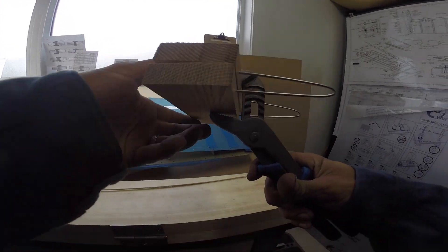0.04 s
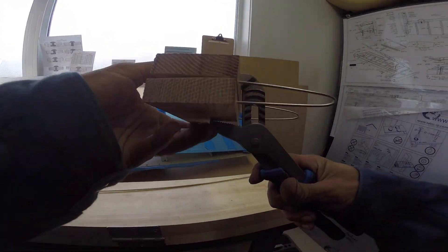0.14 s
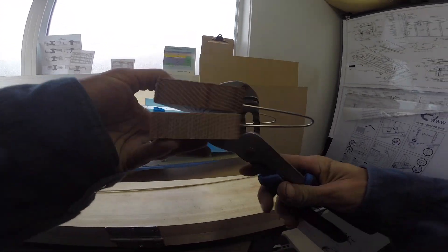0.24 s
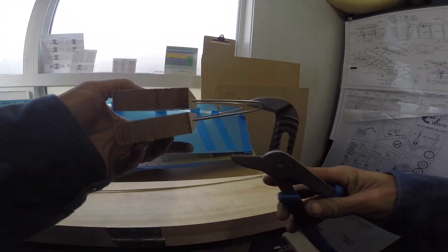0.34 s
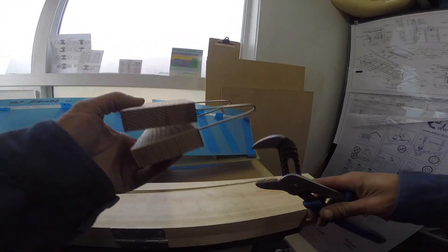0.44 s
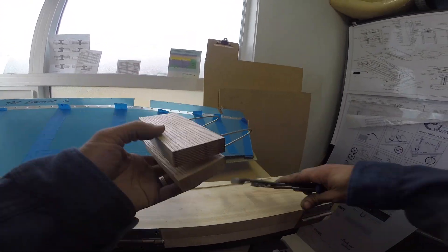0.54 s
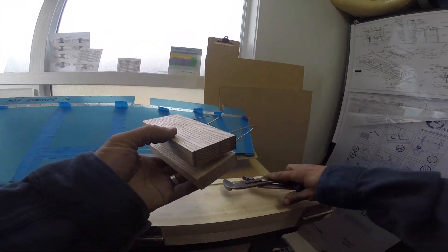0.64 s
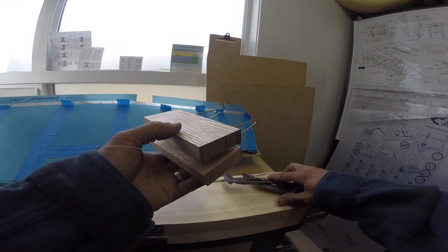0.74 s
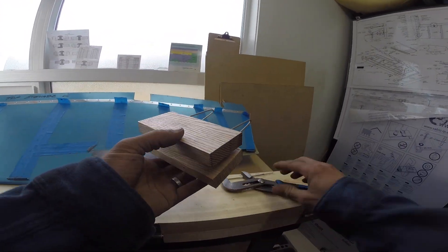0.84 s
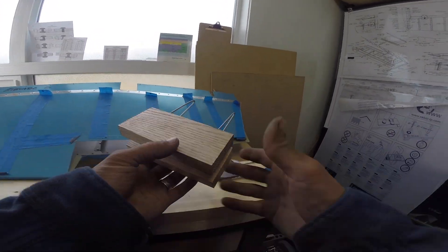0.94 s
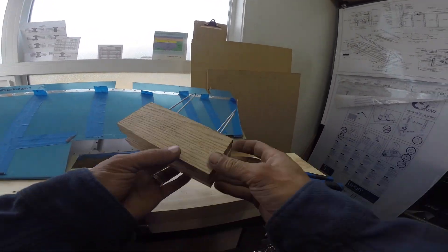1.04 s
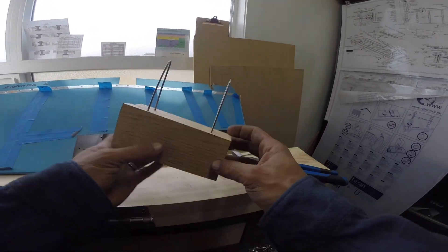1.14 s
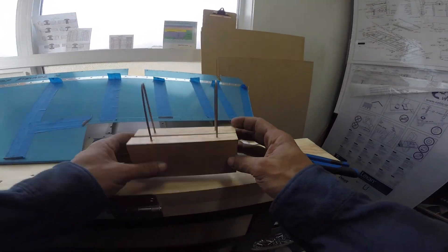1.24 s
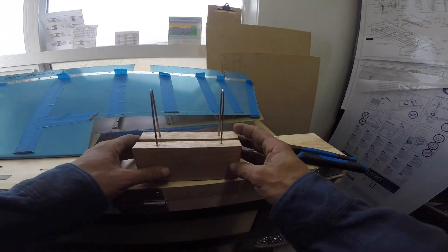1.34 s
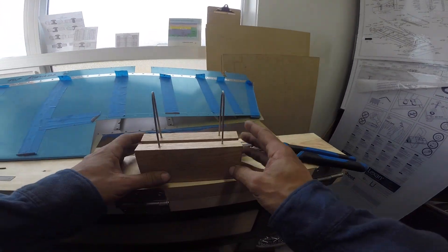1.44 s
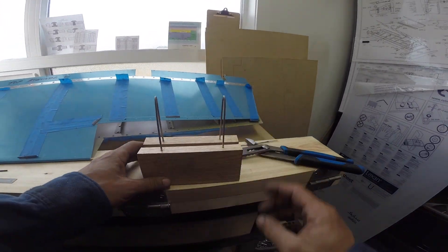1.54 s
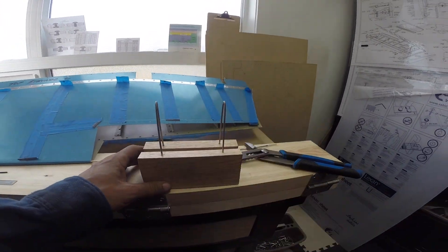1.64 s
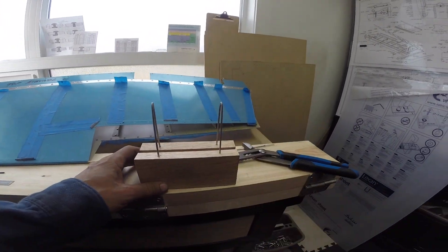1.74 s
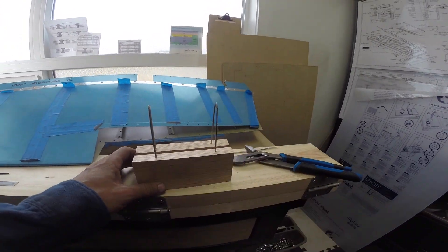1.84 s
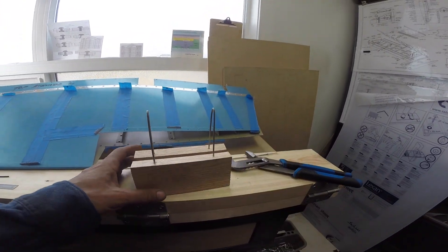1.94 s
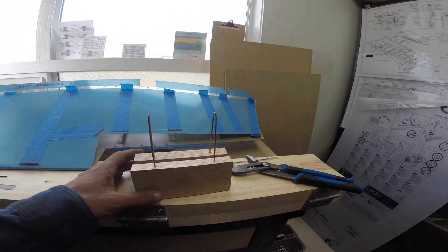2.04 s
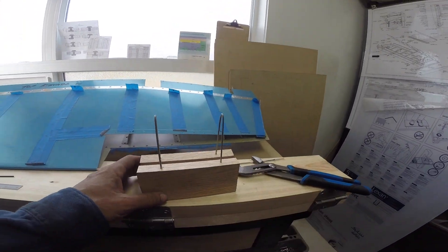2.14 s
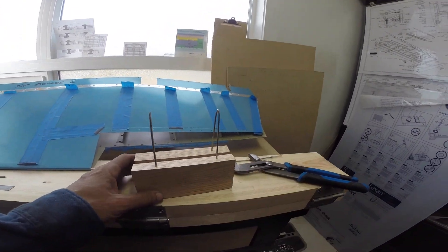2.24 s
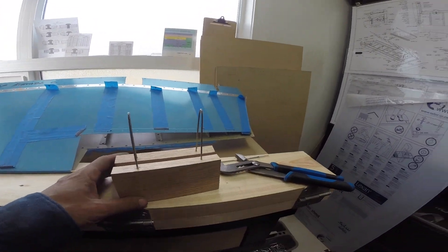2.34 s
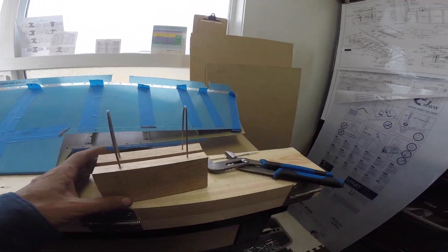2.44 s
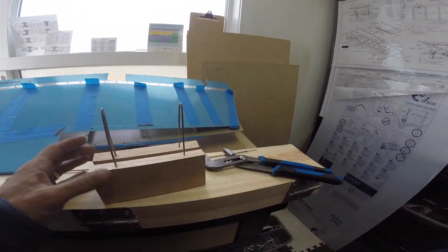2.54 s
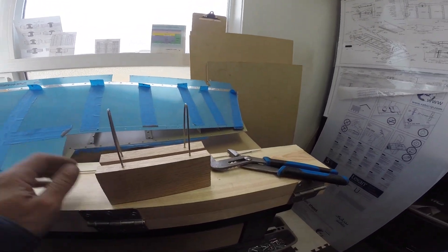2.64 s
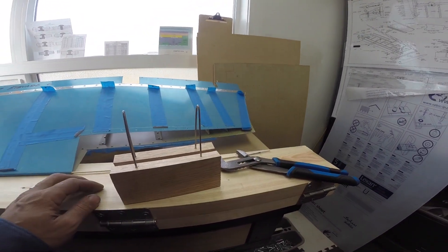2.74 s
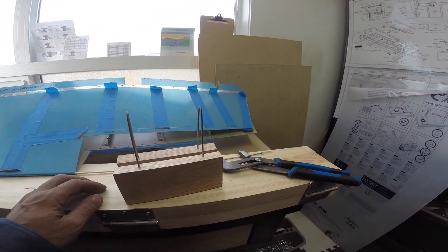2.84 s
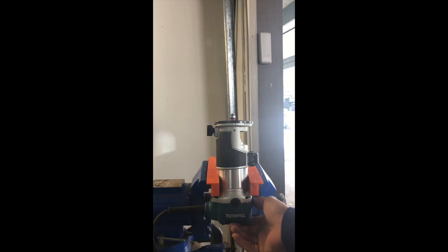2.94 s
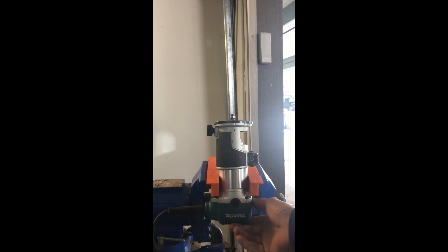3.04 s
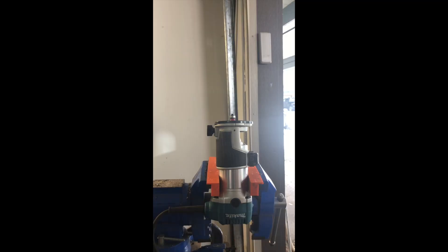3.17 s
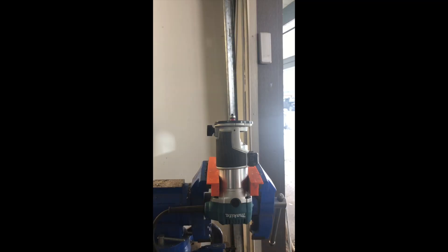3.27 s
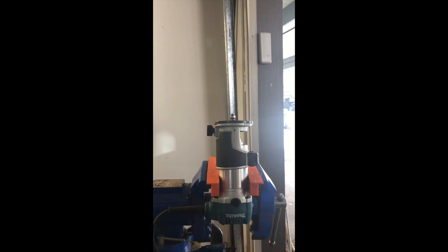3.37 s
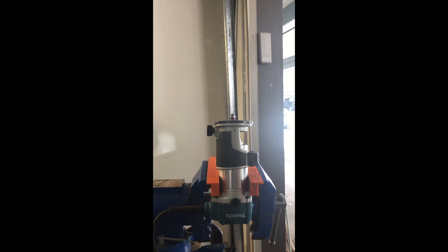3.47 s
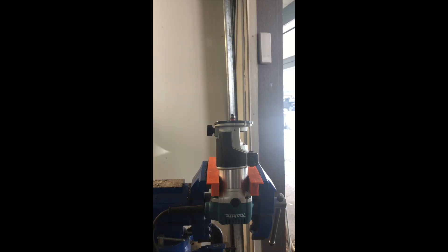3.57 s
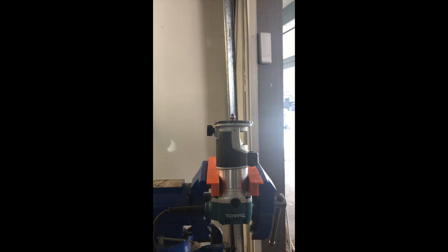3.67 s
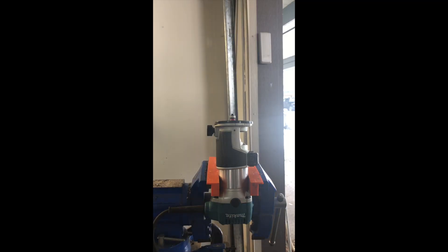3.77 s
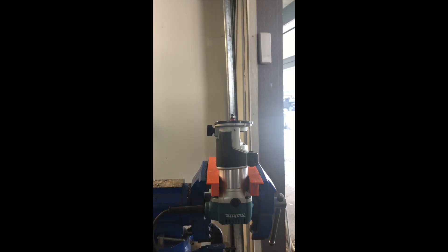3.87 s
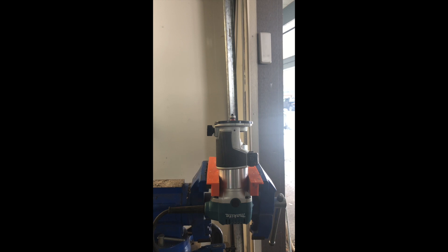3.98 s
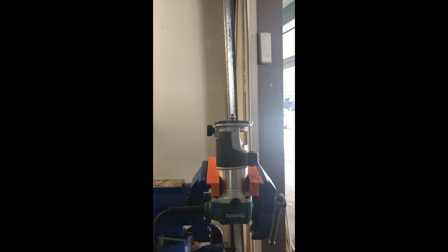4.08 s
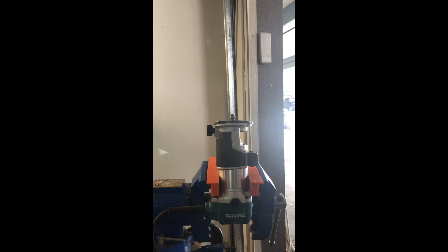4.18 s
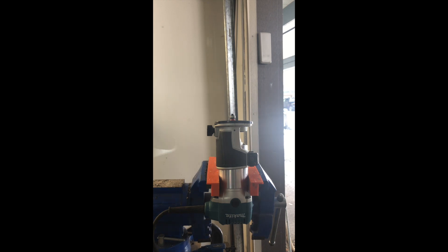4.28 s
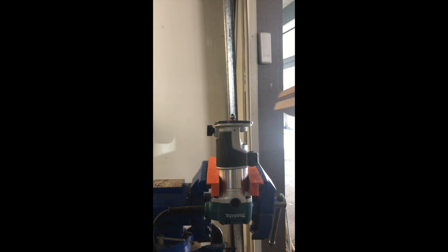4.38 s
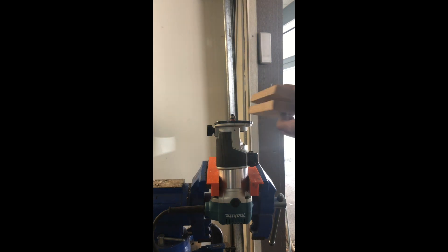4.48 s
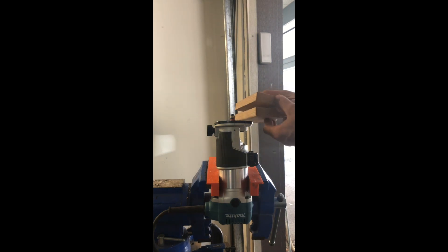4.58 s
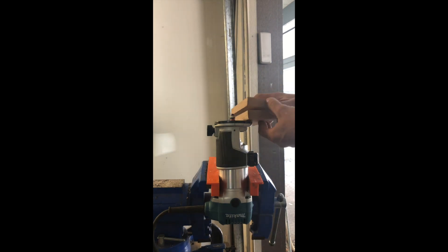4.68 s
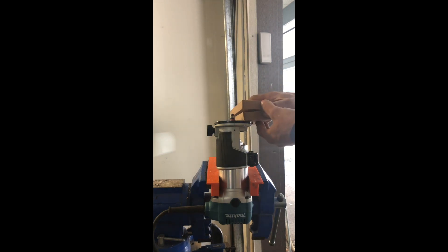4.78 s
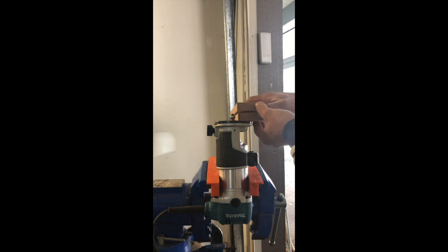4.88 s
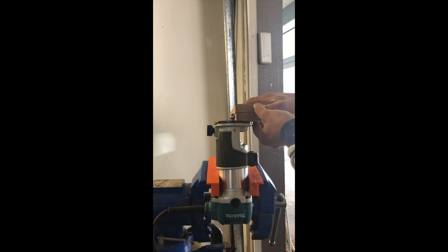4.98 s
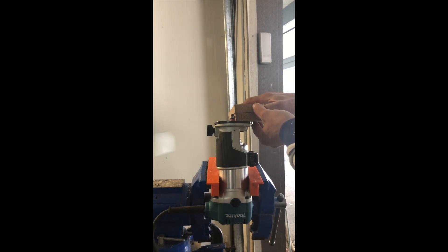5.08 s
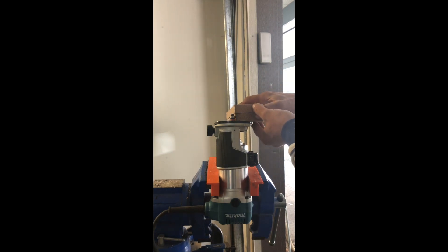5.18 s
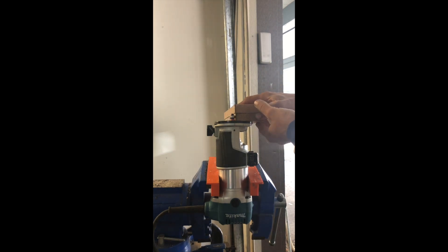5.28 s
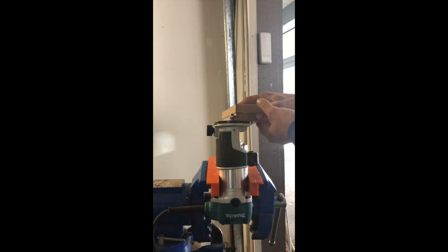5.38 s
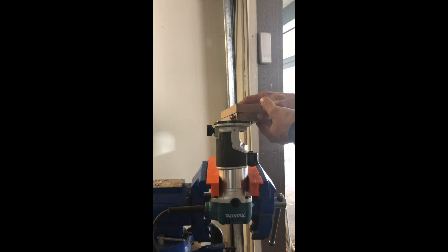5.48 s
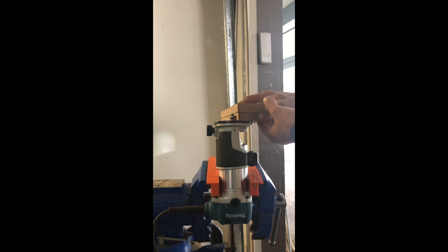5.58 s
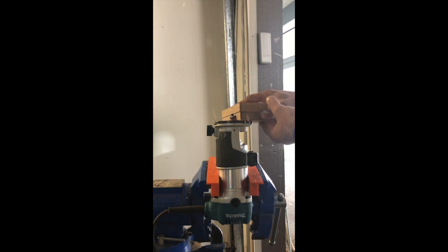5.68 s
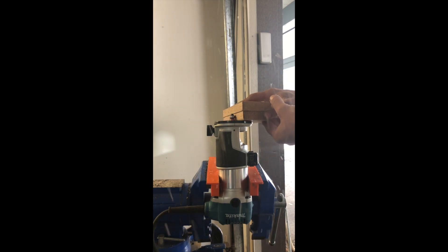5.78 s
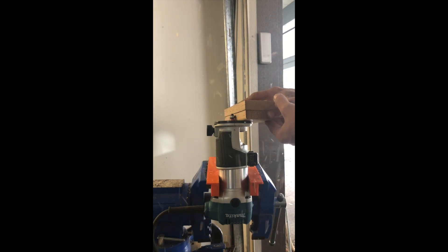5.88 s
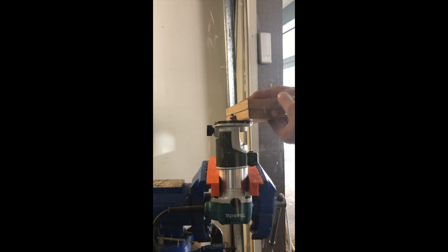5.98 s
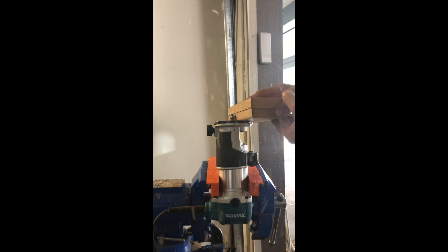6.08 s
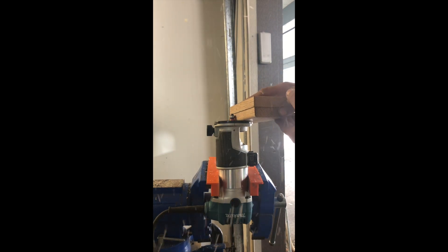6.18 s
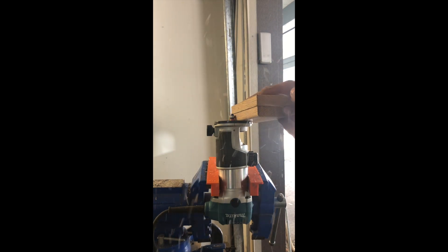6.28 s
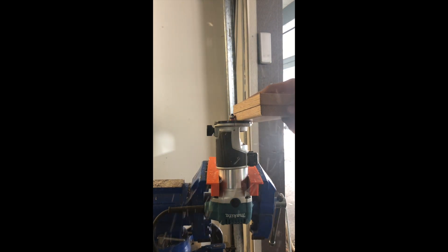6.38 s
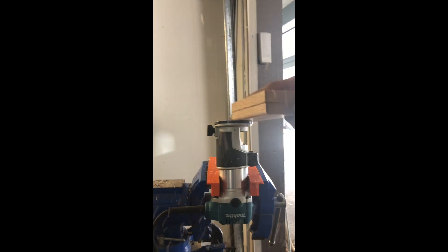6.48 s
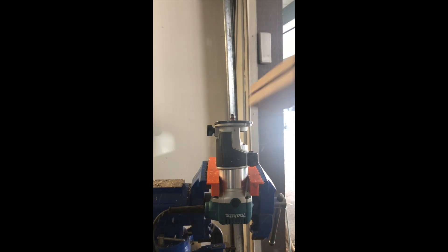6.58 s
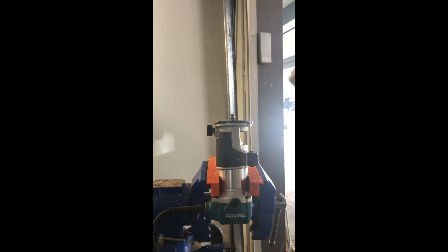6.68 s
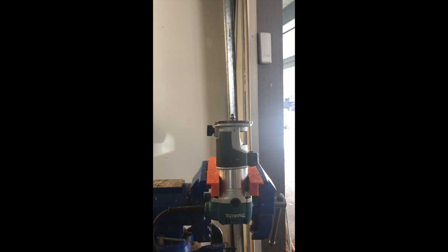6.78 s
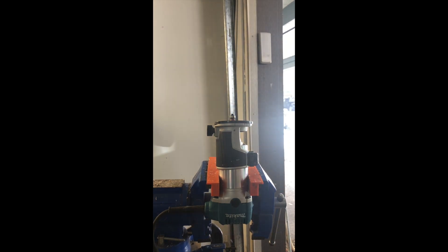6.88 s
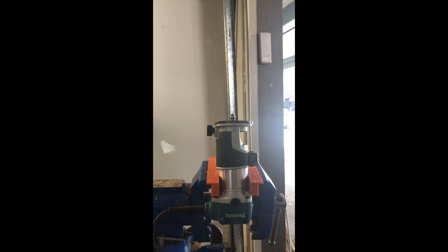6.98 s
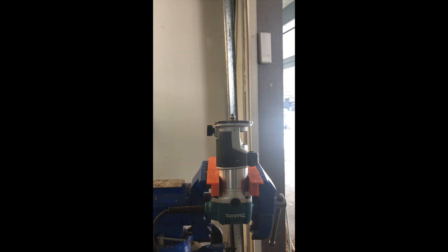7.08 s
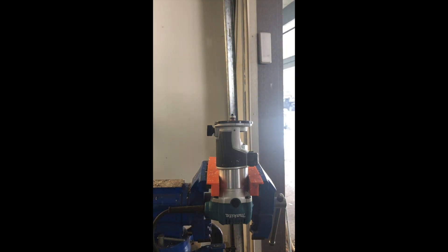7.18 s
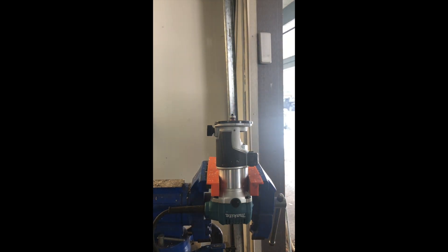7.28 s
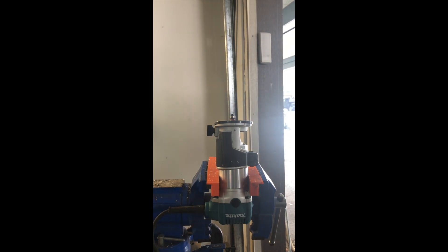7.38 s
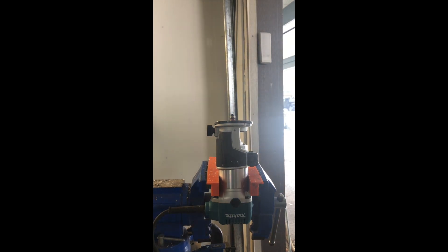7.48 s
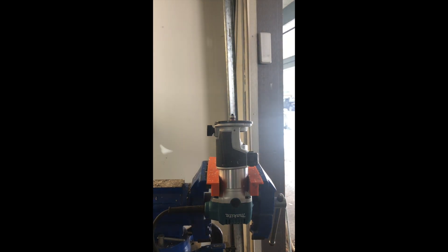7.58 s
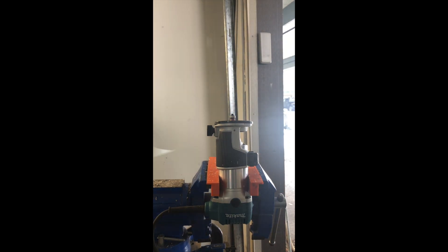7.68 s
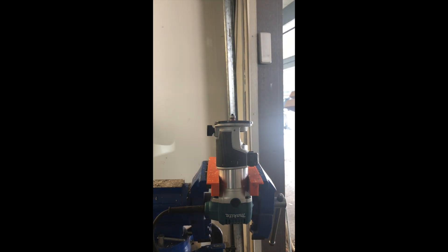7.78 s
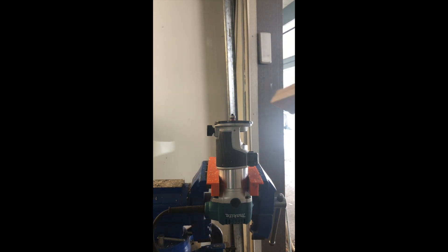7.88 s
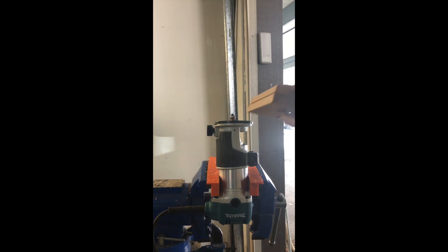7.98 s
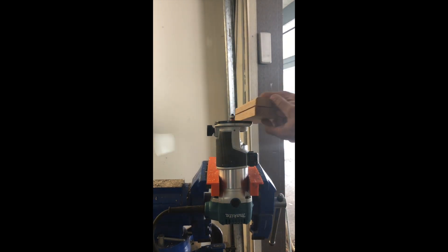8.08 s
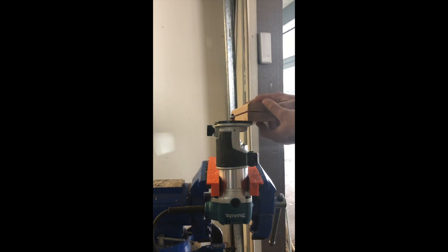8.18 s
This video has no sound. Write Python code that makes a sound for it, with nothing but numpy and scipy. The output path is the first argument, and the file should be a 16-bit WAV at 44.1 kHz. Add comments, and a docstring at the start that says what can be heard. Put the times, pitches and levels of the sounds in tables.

```python
"""A sleeve rustles and steel ticks in a small workshop: pliers slip off a wooden jig's wire pins and
clatter on the bench, each hit ringing steel or wood; the jig is set down and slid. Then, from another
spot, a switch clicks and a trim router in a vice hums, winds up to about 30000 rpm and whines over its
fan's hiss. A hand brings a block to the bit, takes a light, singing cut and withdraws; the hand's
moving reflection sweeps a comb filter through the hiss."""
import sys
import numpy as np
from scipy import signal
from scipy.fft import rfft, irfft
from scipy.io import wavfile
from scipy.ndimage import uniform_filter1d

SR = 44100
rng = np.random.default_rng(int(sys.argv[2]) if len(sys.argv) > 2 else 0)


def store_pcm(level_fs):
    """Save levels as 16-bit WAV."""
    pcm = np.round(np.clip(level_fs, -1, 1) * 32767).astype(np.int16)
    wavfile.write(sys.argv[1], SR, np.atleast_2d(pcm).T)


N = 362502
TIME = np.arange(N) / SR
MOVE_S, POWER_S, PEAK_S = 2.983, 3.105, 3.512  # jump to the vice, power on, top of the run-up
SHAFT_HZ, OVERSHOOT_HZ, SAG_HZ = 497.9, 21, .9  # set speed, overshoot, droop in the cut
BEARING_ORDER = 8.1735  # cycles of the bearing's ring per turn
TOP_HZ = 15750

# room tone at the bench: (frequency [Hz], relative density [dB])
ROOM_COLOUR = [(15, -46), (25, -9.5), (86, -3.5), (281, -7), (421, -9), (469, -10.5), (848, -13),
               (1110, -16.5), (1660, -19.5), (1950, -21), (2630, -23), (15500, -39.5)]
# arm movements: (middle [s], length [s], level [dB])
SLEEVE_SWELLS = [(.12, .55, -64), (1.15, 0.64, -69), (2.08, .45, -69), (2.948, 0.39, -75)]
# hits on each object: (time [s], level [dB], low-pass cutoff [Hz], ring time [factor])
WIRE_HITS = [(.303, -45, 8000, .5), (.353, -47, 8000, .6), (.358, -29.5, 8000, 0.4), (.366, -42, 9000, .6),
             (.372, -38, 12000, 0.53), (.384, -26.5, 15000, 0.92), (.389, -29, 15000, 0.72),
             (.418, -39.5, 15000, 1.2)]
PLIER_HITS = [(.616, -35, 12000, 0.51)]
BENCH_HITS = [(.767, -29, 12000, 0.85), (.789, -27, 377, 0.93), (.835, -17, 6250, 1), (.843, -17, 1300, 1),
              (.857, -17.5, 15000, 0.71), (.863, -13.5, 11000, 0.84), (.887, -22, 11000, 0.75),
              (.896, -22.5, 8000, 1), (2.755, -35.5, 8600, 0.97)]
JIG_HITS = [(1.369, -21, 1040, 0.64), (1.397, -15.5, 9000, 0.95), (1.948, -38, 900, 1),
            (2.011, -42.5, 1400, 1)]
SWITCH_HITS = [(3.067, -40.5, 15000, 0.86), (3.105, -47, 6000, 1)]
# each object's ring: (frequency [Hz], relative level [dB], 60 dB decay [s])
WIRE_MODES = [(2840, -13.5, 0.26), (4250, -9, .1), (4900, -8, 0.08), (7560, 4, 0.071), (7800, 2, 0.093),
              (10600, -3, 0.084), (11360, -14, 0.11), (14920, 2, .12)]
PLIER_MODES = [(4250, 5, 0.055), (6500, 0, .05), (8700, 2, .06), (9500, -11, .07), (10800, -13, .1)]
BENCH_MODES = [(170, -15.5, .12), (313, 3.5, 0.22), (330.4, -6, 0.18), (452, -8.5, 0.22), (676, 4.5, 0.12),
               (763, -12, 0.23), (1052, -6.5, 0.24), (1377, -2.5, 0.089), (1590, -1.5, 0.085),
               (2004, -3, 0.082), (3160, -2.5, 0.044), (4900, -10, 0.075), (6850, -9, .12), (6760, -22, .1)]
JIG_MODES = [(660, -9, 0.21), (772, -1, 0.11), (1020, -20, 0.14), (1390, -4, 0.12), (1550, -3, 0.082),
             (1690, -8, .08), (1960, -26, .073), (2410, -6, .05), (2820, -0.5, 0.07), (3130, 2.5, 0.029),
             (7630, -19, 0.091)]
SWITCH_MODES = [(1700, 1, 0.027), (2400, -8.5, .02), (10600, -8, .02), (14200, -2, .02)]
# crack of contact: (frequency [Hz], relative density [dB])
STEEL_CONTACT = [(300, -11), (2000, -7), (5000, -4), (9000, 1), (15500, 1)]
BENCH_CONTACT = [(60, -27), (250, -9), (900, -3), (2500, -11), (5000, -16.5), (9000, -5.5), (15500, 0.5)]
JIG_CONTACT = [(150, -40), (450, -15), (750, -2), (1500, 0.5), (3100, -3.5), (5000, -14), (9000, -29),
               (15500, -21)]
# pushes of the jig: (start [s], length [s], level [dB])
JIG_SLIDES = [(1.865, .088, -52.5), (2.26, .06, -66)]
# magnetic hum of the field coils: (frequency [Hz], relative level [dB])
COIL_PARTIALS = [(240, -57), (480, -44), (720, -50), (960, -59)]
# fan hiss: (frequency [Hz], relative density [dB])
FAN_COLOUR = [(20, -124), (40, -108), (80, -99), (120, -106), (300, -88), (600, -78), (1000, -69.5),
              (1500, -63), (3000, -66.5), (6000, -62), (11000, -63), (14000, -65), (15500, -65.5)]
# peaks and hollows of housing and base: (centre [Hz], width [Hz], gain open [dB], gain covered [dB])
HOUSING_EQ = [(1880, 420, 5, 3.5), (2257, 97, 10, 10), (2420, 190, 3.5, -2.5), (2650, 43, 7.5, 9),
              (3260, 800, 3, 6), (3950, 620, 1.5, 6), (4860, 320, -9, -1), (7320, 1300, 1.5, 2.5),
              (8500, 850, -5.5, -4.5), (9700, 860, -1.5, -3.5), (11700, 790, 1, -1.5)]
# tones that sweep through housing modes: (shaft multiple, level [dB], mode [Hz], width [Hz], flare [dB])
RUN_UP_FLARES = [(8, -49, 2230, 900, 24.5), (16, -49, 2230, 800, 20), (24, -47, 6800, 1200, 19),
                 (24, -49, 9300, 4000, 15), (48, -47, 6800, 1600, 9)]
# fan and armature tones: (shaft multiple, level at full speed [dB])
ROTOR_PARTIALS = [(4, -43), (6, -44), (8, -39.5), (10, -42.5), (12, -45), (14, -42.5), (16, -35), (18, -47),
                  (32, -49)]
# the bearing's ring and its sidebands: (offset [shaft multiples], relative level [dB])
BEARING_PARTIALS = [(-4, -12), (0, 2.5), (2, -17), (4, -19)]
# lag of the hand's reflection, shorter when close: (time [s], lag [ms])
HAND_LAG = [(4.0, 1.02), (4.3, .63), (4.49, .49), (4.64, .42), (4.9, .39), (5.5, .43), (6.62, .49),
            (6.88, .55), (7.14, .86), (7.3, 1.05), (7.76, .63), (8.05, .49), (8.22, .43)]
# ring of the hand-to-router gap: (centre [Hz], width [Hz], best lag [ms], lag width [ms], level [dB])
GAP_BANDS = [(2400, 670, 0.448, .26, -31.5), (3530, 420, 0.706, 0.14, -32)]
# block over the base, then against the bit: (start [s], end [s], attack [s], release [s])
COVER_ENVELOPE = (4.58, 7.08, 0.31, 0.44)
CUT_ENVELOPE = (5.12, 6.56, 0.356, 0.057)
# tones of the cutting flutes: (shaft multiple, relative level [dB])
FLUTE_PARTIALS = [(4, .5), (6, -22), (8, -12), (10, -11), (12, -22), (14, -24), (16, -11.5), (26, -26),
                  (28, -23), (30, -26)]


def amp(db):
    """Decibels to gain."""
    return 10 ** (np.asarray(db) / 20)


def unit(x):
    """Scale to rms 1."""
    return x / np.sqrt(np.mean(x ** 2))


def bump(x, centre, width):
    """Bell curve of height 1, for a resonance or a swell."""
    return np.exp(-(2 * (x - centre) / width) ** 2)


def gate(start, end, attack, release):
    """Attack, hold and release, 0-1."""
    return np.clip(np.minimum((TIME - start) / attack, (end - TIME) / release), 0, 1)


def eq(points):
    """EQ curve through (frequency [Hz], gain [dB]) points, straight over log frequency."""
    f, db = np.transpose(points)
    return lambda hz: np.interp(np.log(hz + 1), np.log(f), db)


def shape(x, colour):
    """Filter by the curve colour, dB over frequency."""
    return irfft(rfft(x) * amp(colour(np.fft.rfftfreq(len(x), 1 / SR))), len(x))


def noise(colour, size=N):
    """Coloured noise at rms 1."""
    return unit(shape(rng.standard_normal(size), colour))


def walk(rate_hz):
    """Smooth random wander at rms 1."""
    k = max(int(SR / rate_hz), 2)
    steps = np.repeat(rng.standard_normal(N // k + 1), k)
    return unit(uniform_filter1d(uniform_filter1d(steps, k), k)[:N])


def tone(phase, db, flutter_db, rough=0):
    """A machine tone fluttering in moving air; rough adds a narrow skirt of noise."""
    phase = phase + flutter_db / 10 * walk(23) + rng.uniform(0, 2 * np.pi)
    wave = np.sin(phase)
    if rough:
        wave = wave + rough * (walk(400) * wave + walk(400) * np.cos(phase))
    return np.sqrt(2) * amp(db + flutter_db * walk(25)) * wave


def bench_room():
    """A low, gently wavering bed of room tone."""
    return noise(eq(ROOM_COLOUR)) * amp(-52.5 + .48 * walk(5.25))


def sleeve():
    """Cloth rustles faintly and swells as the arm moves."""
    cloth = noise(eq([(300, -21), (2000, -4), (5000, -2.5), (9000, -8.5), (15000, -17)]))
    swells = sum(amp(db) * bump(TIME, s, length) for s, length, db in SLEEVE_SWELLS)
    return cloth * (amp(-68) + swells) * amp(1.4 * walk(40.04))


def knocks(hits, modes, contact, ring_db, crack_db, crack_t60, room_db, room_t60):
    """Each blow rings the object's modes over a crack of contact noise and a duller room tail."""
    out, t = np.zeros(N), TIME[:SR // 2]
    colour = eq(contact)
    ring_rms = np.sqrt(sum(amp(db) ** 2 for _, db, _ in modes) / 2)
    attack = 1 - np.exp(-t / .00039)
    for s, db, cutoff_hz, hold in hits:
        ring = np.zeros(len(t))
        for mode_hz, mode_db, t60 in modes:
            detuned_hz = mode_hz * (1 + .007 * rng.standard_normal())
            phase = 2 * np.pi * detuned_hz * t + rng.uniform(0, 2 * np.pi)
            ring += amp(mode_db - 60 * t / (t60 * hold)) * np.sin(phase)
        crack = noise(colour, len(t)) * amp(crack_db - 60 * t / crack_t60)
        tail = noise(lambda hz: colour(hz) - hz / 1200, len(t)) * amp(room_db - 60 * t / room_t60)
        hit = attack * (amp(ring_db) * ring / ring_rms + crack + tail)
        hit = signal.lfilter(*signal.butter(2, cutoff_hz, fs=SR), hit)  # softer contact, less treble
        start = int(s * SR)
        out[start:start + len(t)] += amp(db) * hit
    return out


def plier_slip():
    """Steel jaws tick off the wire pins, then the pliers give one bright click."""
    wire = knocks(WIRE_HITS, WIRE_MODES, STEEL_CONTACT,
                  ring_db=-1, crack_db=1, crack_t60=.039, room_db=-19, room_t60=.14)
    pliers = knocks(PLIER_HITS, PLIER_MODES, STEEL_CONTACT,
                    ring_db=2, crack_db=4, crack_t60=.019, room_db=-9, room_t60=.13)
    return wire + pliers


def bench_clatter():
    """Dropped pliers bounce and ring the bench's low wooden modes; later a tap of the block rings them once
    more."""
    return knocks(BENCH_HITS, BENCH_MODES, BENCH_CONTACT,
                  ring_db=-5.5, crack_db=3.5, crack_t60=.057, room_db=-9, room_t60=.17)


def jig_knocks():
    """The jig lands, wood on wood, with a short, dry ring."""
    return knocks(JIG_HITS, JIG_MODES, JIG_CONTACT,
                  ring_db=1.5, crack_db=3, crack_t60=.031, room_db=-10.5, room_t60=.19)


def jig_slide():
    """Sliding friction makes the wire pins sing."""
    pins = noise(lambda hz: 14 * bump(hz, 7700, 700) + 16 * bump(hz, 10700, 1300))
    pushes = sum(amp(db) * gate(s, s + length, .015, .015) for s, length, db in JIG_SLIDES)
    return pins * amp(2.2 * walk(200)) * pushes


def vice_room():
    """The quieter, darker room tone around the vice."""
    colour = eq([(20, -36), (40, -15), (80, -10), (120, 15.5), (500, 7.5), (2000, -2), (15000, -23)])
    return noise(colour) * amp(-64.5)


def switch():
    """The switch snaps over in two tight clicks."""
    return knocks(SWITCH_HITS, SWITCH_MODES, STEEL_CONTACT,
                  ring_db=-4, crack_db=4, crack_t60=.012, room_db=-20, room_t60=.16)


def shaft_speed(cutting, climb_s=.44, settle_s=.12, hunt_s=.2):
    """Turns per second: a soft-start S-curve overshoots, the governor pulls back, the cut drags."""
    progress = np.clip(1 + (TIME - PEAK_S) / climb_s, .01, 1)
    climb = (SHAFT_HZ + OVERSHOOT_HZ) * np.sin(np.pi / 2 * progress) ** 2
    hunting = OVERSHOOT_HZ * bump(TIME, PEAK_S, settle_s) * np.cos(2 * np.pi * (TIME - PEAK_S) / hunt_s)
    speed = np.where(TIME < PEAK_S, climb, SHAFT_HZ + hunting) - SAG_HZ * cutting
    return speed * (1 + .00018 * walk(12))


def coils_and_brushes(pace):
    """Coils hum and scraping brushes ring the housing; a slow armature draws more current for both."""
    current_db = -14 + 15.5 * np.clip(1 - pace ** 4, 0, 1)
    hum = sum(tone(2 * np.pi * hz * TIME, current_db + db, flutter_db=.5) for hz, db in COIL_PARTIALS)
    scrape = noise(lambda hz: 14 * bump(hz, 1770, 1800) + 13 * bump(hz, 2250, 450)
                   + 12 * bump(hz, 4200, 600) + 9 * bump(hz, 6900, 700))
    return hum + scrape * amp(current_db - 50 + 13 * np.sqrt(pace))


def fan_air(angle, pace, cover, cutting):
    """Turbulence builds with speed, chopped by the flutes and coloured by housing and block."""
    white = rng.standard_normal(N) * np.sqrt(SR / 2)  # 0 dB per Hz
    chop = 1 + (.19 + .11 * cutting) * np.sin(2 * angle)
    swell = (pace ** 2.2 + .0064) * amp(.32 + .38 * walk(30))
    hiss = shape(white * chop * swell, eq(FAN_COLOUR))
    free = shape(hiss, lambda hz: sum(db * bump(hz, f, width) for f, width, db, _ in HOUSING_EQ))
    covered = shape(hiss, lambda hz: sum(db * bump(hz, f, width) for f, width, _, db in HOUSING_EQ))
    return (1 - cover) * free + cover * covered


def run_up(speed, angle):
    """Starting current shakes slots and brushes; the rising tones flare through the housing's modes."""
    strain = np.clip(speed / 200, 0, 1) ** 3 * np.clip(4 * (1 - speed / SHAFT_HZ), 0, 1)
    out = np.zeros(N)
    for order, db, mode_hz, width_hz, flare_db in RUN_UP_FLARES:
        hz = order * speed
        level_db = db + flare_db * bump(hz, mode_hz, width_hz)
        out += (hz < TOP_HZ) * tone(order * angle, level_db, flutter_db=1.5, rough=.3 + order / 50)
    return strain * out


def whine(speed, angle, growth_db, overshoot, lag_ms, cutting):
    """Two cycles a turn: dips near 650 Hz and at the overshoot, shaded by the hand and the cut."""
    hz = 2 * speed
    onset = np.clip((hz - 430) / 40, 0, 1) * amp(-10 * bump(hz, 650, 170))
    near = (lag_ms.max() - lag_ms) / np.ptp(lag_ms)
    dip_db = 3 * near + 2.5 * cutting + 7 * overshoot + 4 * bump(TIME, PEAK_S, .3)
    return onset * tone(2 * angle, -25.5 + growth_db - dip_db, flutter_db=.45)


def commutator(angle, growth_db, overshoot, lag_ms, cover, bars=24):
    """The bars whistle, louder with the hand very close and softer under the block."""
    lift_db = 10.5 * bump(lag_ms, .396, .064) * (1 - cover)
    level_db = -31 + 4.2 * growth_db + lift_db - 4 * cover - 2.5 * overshoot
    return tone(bars * angle, level_db, flutter_db=2.5, rough=.15)


def rotor(angle, growth_db, cutting):
    """Fan and armature harmonics grow with speed and give way to the flutes in the cut."""
    tones = sum(tone(order * angle, db + 4 * growth_db, flutter_db=3.5) for order, db in ROTOR_PARTIALS)
    return (1 - cutting) * tones


def bearing(speed, angle, growth_db, overshoot, lag_ms, facing, cover, cutting):
    """A rough ring beating with the shaft; the hand's inverted echo ducks it at whole-cycle lags."""
    lag_cycles = BEARING_ORDER * speed * lag_ms / 1000
    comb_db = 20 * np.log10(np.abs(1 - .7 * facing * np.exp(2j * np.pi * lag_cycles)))
    level_db = -29.3 + 9 * growth_db + comb_db - 1.5 * cover - cutting - 8 * overshoot
    return sum(tone((BEARING_ORDER + offset) * angle, level_db + db, flutter_db=.5, rough=.23)
               for offset, db in BEARING_PARTIALS)


def hand_echo(air, lag_ms, facing, cover):
    """The hand throws back the hiss's upper mids, late and inverted; the block screens most of it."""
    colour = eq([(1300, -20), (2200, -4), (2900, 1.5), (4200, 1), (6000, -8), (9000, -6), (15000, -14)])
    late = np.interp(TIME - lag_ms / 1000, TIME, shape(air, colour))
    return -.56 * facing * (1 - .72 * cover) * late


def gap_ring(lag_ms, cover):
    """Air rings between hand and router at certain distances, unless the block closes the gap."""
    out = np.zeros(N)
    for centre, width, best_ms, zone_ms, db in GAP_BANDS:
        band = noise(lambda hz: -40 * np.log10(1 + (2 * (hz - centre) / width) ** 4))
        out += band * amp(db) * bump(lag_ms, best_ms, zone_ms)
    return (1 - cover) * out


def cut(angle, cutting, ease_db_per_s=1.24):
    """The bit sings as it bites; flute tones, shakier up high, ease off over a faint rumble."""
    cut_db = -20.5 - ease_db_per_s * (TIME - CUT_ENVELOPE[0])
    flutes = sum(tone(order * angle, cut_db + db, flutter_db=.17 * np.sqrt(order - 3))
                 for order, db in FLUTE_PARTIALS)
    bite = tone(12 * angle, -34.5, flutter_db=4, rough=.26) * bump(TIME, 5.35, .3)
    rumble = noise(lambda hz: -40 * np.log10(1 + (hz / 60) ** 2)) * amp(-77 + 4 * walk(9))
    return bite + cutting * (flutes + rumble)


def router():
    """One shaft drives the router's layers while hand and block move in and out."""
    cover, cutting = gate(*COVER_ENVELOPE), gate(*CUT_ENVELOPE)
    speed = shaft_speed(cutting)
    pace, angle = speed / SHAFT_HZ, 2 * np.pi * np.cumsum(speed) / SR
    growth_db = 20 * np.log10(np.minimum(pace, 1))
    overshoot = bump(speed, SHAFT_HZ + OVERSHOOT_HZ, OVERSHOOT_HZ)
    lag_ms = np.interp(TIME, *np.transpose(HAND_LAG))
    facing = bump(lag_ms, centre=.57, width=.55)  # the hand reflects best at one distance
    air = fan_air(angle, pace, cover, cutting)
    motor = (coils_and_brushes(pace) + run_up(speed, angle)
             + whine(speed, angle, growth_db, overshoot, lag_ms, cutting)
             + commutator(angle, growth_db, overshoot, lag_ms, cover)
             + rotor(angle, growth_db, cutting)
             + bearing(speed, angle, growth_db, overshoot, lag_ms, facing, cover, cutting))
    hand = hand_echo(air, lag_ms, facing, cover) + gap_ring(lag_ms, cover)
    power = np.clip((TIME - POWER_S) / .013, 0, 1)
    return power * (air + motor + hand + cut(angle, cutting))


def thud():
    """One soft, dull bump near the end."""
    body = noise(lambda hz: 45 * bump(hz, 120, 130) - 20 * np.log10(1 + hz / 300))
    return body * amp(-57.5) * bump(TIME, 7.72, .11)


def scene():
    """A hard cut from bench to vice, the same in both channels."""
    bench = bench_room() + sleeve() + plier_slip() + bench_clatter() + jig_knocks() + jig_slide()
    vice = vice_room() + switch() + router() + thud()
    mono = np.where(TIME < MOVE_S, bench, vice)
    return np.array([mono, mono])


def record(dry):
    """A steep low-pass shaves off the very top."""
    return signal.sosfilt(signal.ellip(12, .1, 80, TOP_HZ, fs=SR, output="sos"), dry)


dry = scene()
out = record(dry)
store_pcm(out)
```